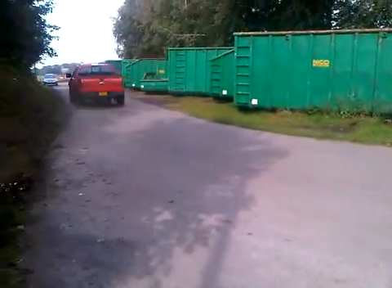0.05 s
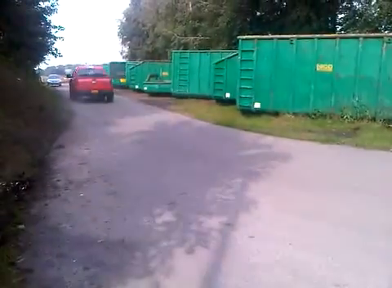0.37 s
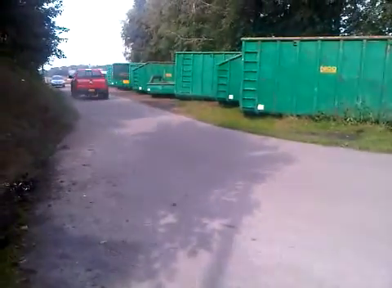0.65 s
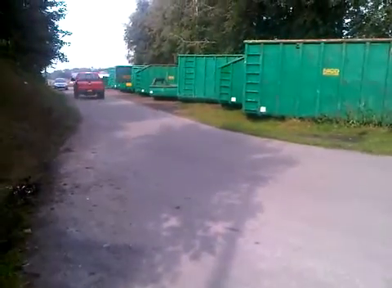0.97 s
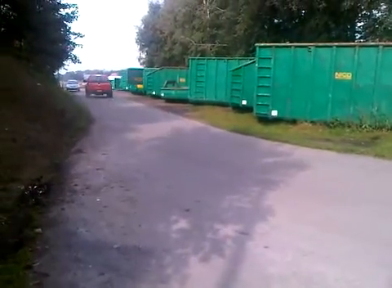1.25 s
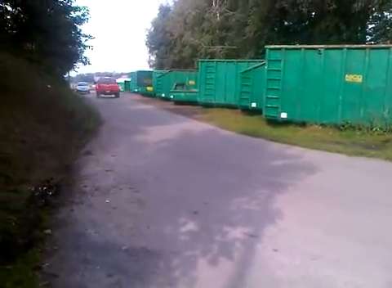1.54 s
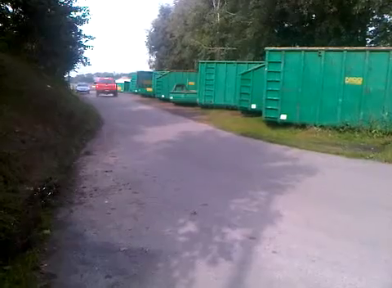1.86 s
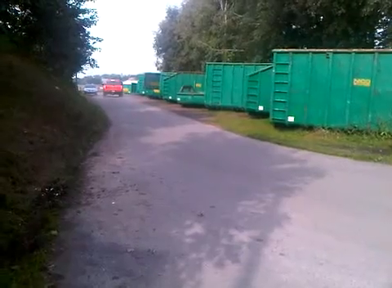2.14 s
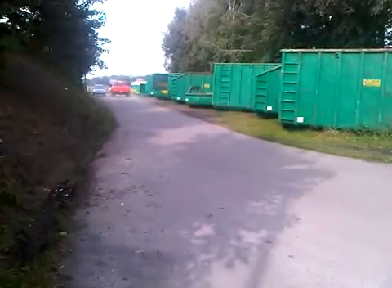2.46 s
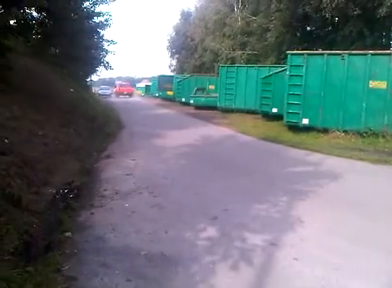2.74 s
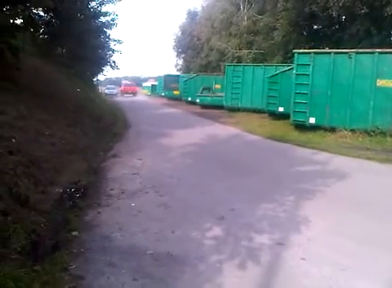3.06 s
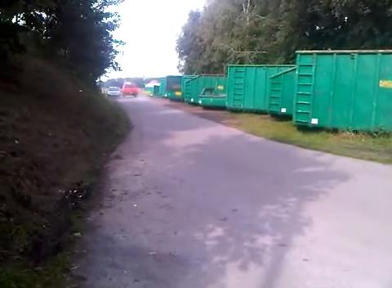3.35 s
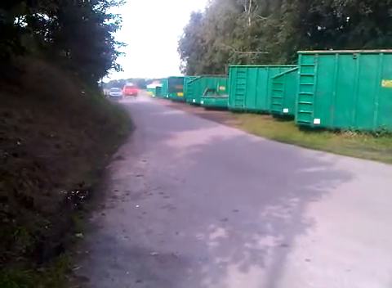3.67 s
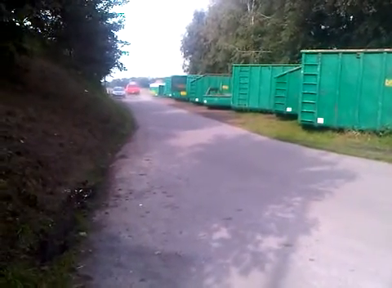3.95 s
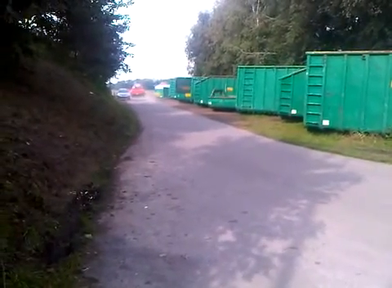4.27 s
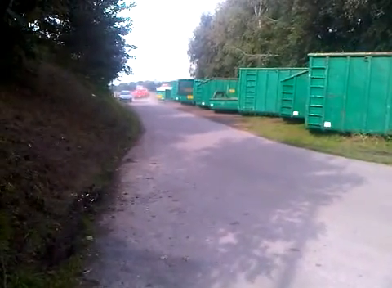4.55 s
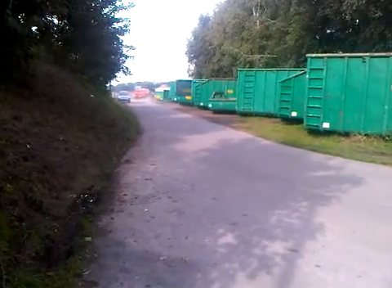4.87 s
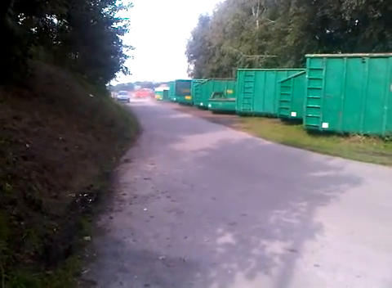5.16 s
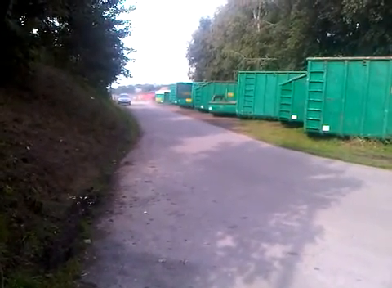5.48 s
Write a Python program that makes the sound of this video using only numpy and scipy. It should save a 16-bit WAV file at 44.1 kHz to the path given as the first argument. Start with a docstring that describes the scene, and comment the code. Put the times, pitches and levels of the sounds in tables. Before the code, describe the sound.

A large engine rumbles off along a paved road, easing off and fading into the distance, with soft wind and faint scuffs.

```python
"""A V8 pickup burbles past 12 m off and heads away down a paved lane; it changes up, coasts, pulls again.
Its two cylinder banks fire unevenly through the muffler, over tread roar and a rush of gas and grit.
Steel skips down the lane echo the note, and far off a roadside bank comes between truck and microphone.
Light wind hisses in the trees and bumps the microphone; something scuffs faintly close by."""
import sys
import numpy as np
from scipy import signal
from scipy.fft import rfft, irfft, next_fast_len
from scipy.io import wavfile

SR = 44100
rng = np.random.default_rng(int(sys.argv[2]) if len(sys.argv) > 2 else 0)


def dump_mix(stems):
    """Bounce the given channels to the path in sys.argv[1] as a 16-bit WAV at rate SR."""
    frames = np.atleast_2d(stems).T  # one column per channel
    limited = np.clip(frames, -1, 1)  # hard clip at full scale
    pcm = np.round(limited * 32767).astype(np.int16)
    wavfile.write(sys.argv[1], SR, pcm)


N = 247401
TIME = np.arange(N) / SR

# engine speed, eight firings to a cycle: (time [s], cycle rate [Hz])
ENGINE_SPEED = [(0, 24.3), (.1, 24.35), (.19, 24.85), (.29, 25.1), (.39, 24.85), (.57, 25.27), (.78, 25.8),
                (1.15, 26), (1.23, 24.2), (1.3, 22.8), (1.39, 22), (1.5, 19.4), (1.68, 17.4), (1.8, 17),
                (2, 16.7), (2.22, 16.1), (2.42, 14.7), (2.62, 15.4), (2.78, 14.7), (2.9, 15.5),
                (3.15, 15.7), (3.7, 15.6), (4, 15.2), (4.35, 14.2), (5.15, 14.8), (5.28, 23), (5.45, 23.8),
                (5.61, 23)]
# the driver pulls, lifts off, coasts and pulls again: (time [s], throttle [0-1])
THROTTLE = [(0, 0.86), (1.33, 0.75), (1.52, 0.34), (1.72, 0.07), (4.97, 0), (5.3, 0), (5.61, 0.5)]
def engine():
    """The V8 under the driver's foot: cycle rate, cycles turned so far, and throttle."""
    cycle_hz, = curves(ENGINE_SPEED)
    throttle, = curves(THROTTLE)
    return cycle_hz, np.cumsum(cycle_hz) / SR, throttle


def exhaust(cycle_hz, cycles, throttle, coast_db=-40.5, pull_db=14, shade_db=-17):
    """The tailpipe from up the lane: note, echo and rumble, rougher when coasting or behind the bank."""
    spread_db, hidden = journey()
    surge_db, splutter_db, burble_db = surges()
    note = engine_note(cycle_hz, cycles, throttle, hidden, burble_db)
    note += skip_echo(note)
    rumble = muffler_rumble(cycle_hz, cycles)
    roughness = gain_of(-15.75 + 4.5 * (1 - throttle) + 7.5 * hidden + splutter_db)
    level_db = coast_db + pull_db * throttle + spread_db + shade_db * hidden + surge_db
    level_db += 0.6 * wander(16)  # strong and weak cycles come in runs
    return gain_of(level_db) * (note + roughness * rumble) / np.sqrt(1 + roughness ** 2)


# engine orders, relative: (multiple of the cycle rate, level pulling [dB], level coasting [dB])
ORDERS = [(3, -21.5, -31), (4, -16.5, -32), (5, 5.5, -18.5), (6, -5.5, -24), (7, -3.5, -13.5),
          (8, 0.5, 2.5), (9, -20.5, -11.5), (10, -15.5, -9.5), (11, -14.5, -3.5), (12, -16, -18),
          (13, -5, -3.5), (14, -15.5, -6), (15, -36.5, -9.5), (16, -16, -18), (17, -18, -13),
          (18, -34.5, -5.5), (19, -32, -4.5), (20, -25.5, -24.5)]
# resonances the coasting engine sinks through: (frequency [Hz], half width [Hz], gain [dB])
BOOMS = [(172, 11, 11.5), (211.3, 7.2, 12), (235, 4, 5), (263, 9.6, -8), (293, 8.7, 2.5), (317.7, 6.9, 2)]
def engine_note(cycle_hz, cycles, throttle, hidden, burble_db, muffler_hz=327):
    """Each cylinder bank fires unevenly, so other orders burble around the firing note, order 8."""
    shaken = cycles + 0.003 * wander(28)  # the crank never turns quite evenly
    fading = np.sqrt(hidden)
    note, power = np.zeros(N), np.zeros(N)
    for order, pulling_db, coasting_db in ORDERS:
        order_hz = order * cycle_hz
        boom_db = sum(db / (1 + ((order_hz - hz) / width) ** 2) for hz, width, db in BOOMS)
        muffled = 1 / np.sqrt(1 + (order_hz / muffler_hz) ** 10)
        amplitude = muffled * gain_of(throttle * pulling_db + (1 - throttle) * (coasting_db + boom_db))
        # each order wavers as the truck moves, and breaks up behind the roadside bank
        amplitude *= gain_of((1.2 + 5 * fading) * wander(8.2))
        phase = 2 * np.pi * (order * shaken + rng.random()) + (0.06 + 0.5 * fading) * wander(12)
        if order != 8:
            amplitude *= gain_of(burble_db)
        note += amplitude * np.cos(phase)
        power += amplitude ** 2 / 2
    return note / np.sqrt(power)


# what the muffler lets through: (frequency [Hz], relative level [dB])
MUFFLER_SPECTRUM = [(20, -20), (60, -23), (90, -21.5), (108, -14), (128, -0.5), (170, -5.5), (215, -5),
                    (245, -3.5), (275, -3), (335, -3.5), (375, -13.5), (470, -26.5), (700, -38),
                    (1500, -68)]
# where it rings: (frequency [Hz], width [Hz], gain [dB])
MUFFLER_RINGS = [(131, 12, 6), (206, 12, 2.5), (280, 16, 7.5), (335, 18, 2), (394, 25, 2.5)]
def muffler_rumble(cycle_hz, cycles, gas=0.44):
    """The unequal part of each firing thuds through the muffler along with gas noise."""
    firings = np.diff(np.floor(8 * cycles), prepend=0)
    thuds = evened(firings * rng.standard_normal(N) / np.sqrt(cycle_hz))
    return coloured(thuds + gas * rng.standard_normal(N), MUFFLER_SPECTRUM, MUFFLER_RINGS)


# brief splutters and booms: (time [s], length [s], level [dB], roughness [dB], burble [dB])
SURGES = [(0.085, 0.39, 1, 8, -3.5), (0.33, 0.047, 1, -1, 1.5), (0.49, 0.3, -0.5, 2.5, 5),
          (0.377, 0.014, -6, 17, -2), (1.0, 0.26, -0.2, -4.5, -1.5), (1.22, 0.065, 2.5, 2.5, -0.5),
          (1.249, 0.01, -7, 0, 6.5), (1.308, 0.027, 5, 3, -15), (1.376, 0.036, 11, -5, -33.5),
          (1.451, 0.014, 9, 2.5, -18), (1.526, 0.05, 5, -8, 4.5), (1.9, 0.16, -1, -4, -1.5),
          (1.93, 0.02, -4, -3.5, 6), (2.7, 0.05, 3, -2, -7), (1.99, 0.05, 2.5, -3, -6.5),
          (1.434, 0.032, -0.5, -6.5, -1.5), (1.6, 0.05, 2, -6, 0), (2.27, 0.14, 4, -11.5, 2),
          (2.491, 0.036, 4.5, 16, 2), (2.58, 0.035, -5, 2, -1), (2.39, 0.056, -1.5, 8, 0),
          (2.857, 0.055, 0, -2, 5), (2.64, 0.039, 4.5, -2, 3), (2.922, 0.024, 4.5, -14, 12),
          (3.78, 0.17, 7, -6, 2.5), (5.097, 0.11, 6.5, 5.5, -12), (5.513, 0.57, 10, -9, -1.5),
          (5.38, 0.063, 2, 2, -2)]
def surges(shift_s=1.2, shift_db=-4):
    """Decibels added to the exhaust's level, roughness and burble; the burble dips at the gear change."""
    level_db, rough_db, burble_db = sum(np.outer(dbs, swell(s, length)) for s, length, *dbs in SURGES)
    return level_db, rough_db, burble_db + shift_db * swell(shift_s, length=0.05)


START_M, TRUCK_M_PER_S = 12.46, 10.82  # starting distance from the microphone; speed away from it
def journey(bank_from_m=37.1, bank_to_m=64.2):
    """Spreading loss in dB as the truck recedes, and how far the roadside bank hides it (0-1)."""
    distance_m = START_M + TRUCK_M_PER_S * TIME
    hidden = np.clip((distance_m - bank_from_m) / (bank_to_m - bank_from_m), 0, 1)
    return -20 * np.log10(distance_m / START_M), hidden


# the echo against the direct note: (time [s], level [dB])
ECHO_LEVEL = [(0, -10), (0.4, -6), (0.66, -15.5), (0.8, -1), (1.0, -2.5), (1.22, -1), (1.3, -15),
              (1.45, -19), (1.62, -5.5), (1.75, -10), (1.9, -1.5), (2.15, -14), (2.5, -2.5), (3.5, -8.5),
              (5.61, -3)]
def skip_echo(note, down_lane_m=45, aside_m=14, low_cut_hz=178):
    """Steel skips throw the note back without its bass, late and raised in pitch as the truck nears."""
    level_db, = curves(ECHO_LEVEL)
    ahead_m = down_lane_m - START_M - TRUCK_M_PER_S * TIME
    delay_s = (ahead_m + np.hypot(ahead_m, aside_m)) / 343
    thin = signal.sosfiltfilt(signal.butter(4, low_cut_hz, "high", fs=SR, output="sos"), note)
    return gain_of(level_db) * np.interp(TIME - delay_s, TIME, thin, left=0)


# hiss at the mouth of the tailpipe: (frequency [Hz], relative level [dB])
HISS_SPECTRUM = [(2000, -31.5), (2550, -15.5), (2750, -4.5), (2900, -0.5), (3130, -5), (3350, -17),
                 (4300, -31), (7000, -41.5)]
# its level at the microphone: (time [s], level [dB])
HISS_LEVEL = [(0, -65), (0.3, -56), (0.62, -64), (0.85, -56.5), (1.15, -61), (1.4, -68), (1.65, -80),
              (2, -100)]
def tailpipe_hiss(cycles, flutter_depth=0.28, flicker_db=0.26):
    """A thin, slightly fluttering tailpipe hiss that fades as the truck moves away."""
    level_db, = curves(HISS_LEVEL)
    flutter = 1 + flutter_depth * np.cos(2 * np.pi * 8 * cycles)
    hiss = coloured(rng.standard_normal(N) * flutter, HISS_SPECTRUM)
    return hiss * gain_of(level_db - flicker_db * wander(40))


# tread on the paving: (frequency [Hz], relative level [dB])
TYRE_SPECTRUM = [(100, -31), (460, -39), (530, -19), (620, -6.5), (695, 0), (770, 0), (860, -2),
                 (980, -7.5), (1120, -19), (1350, -13), (1600, -31), (3000, -73)]
# narrow colours in the roar: (frequency [Hz], width [Hz], gain [dB])
TYRE_RINGS = [(703, 10, 3.5), (760, 26, -0.5), (854, 61, 1.5)]
def tyre_roar(start_db=-46, spread_share=0.55, shade_db=-17, flutter_db=0.86):
    """The tread roars on the lane, losing less with distance than the exhaust does."""
    spread_db, hidden = journey()
    level_db = start_db + spread_share * spread_db + shade_db * hidden
    roar = coloured(rng.standard_normal(N), TYRE_SPECTRUM, TYRE_RINGS)
    return roar * gain_of(level_db + flutter_db * wander(62))


# gas and grit behind the truck: (frequency [Hz], relative level [dB])
RUSH_SPECTRUM = [(300, -6), (600, 3.5), (1100, -6), (1450, 2.5), (1750, -0.5), (2550, -3), (2900, 3),
                 (3300, -7.5), (4300, -19), (6000, -31), (7200, -38.5), (8200, -49.5)]
# narrow colours in the rush: (frequency [Hz], width [Hz], gain [dB])
RUSH_PEAKS = [(2316, 29, 4.5), (2985, 150, 2), (3490, 77, 4.5), (4915, 140, 11), (5685, 350, 11),
              (6830, 530, 12)]
def gas_rush(throttle, coast_db=-51.5, pull_db=4.5, shade_db=-5.5, flutter_db=1.25):
    """A rush of gas and grit follows the throttle and sinks away down the lane."""
    spread_db, hidden = journey()
    level_db = coast_db + pull_db * throttle + spread_db + shade_db * hidden
    rush = coloured(rng.standard_normal(N), RUSH_SPECTRUM, RUSH_PEAKS)
    return rush * gain_of(level_db + flutter_db * wander(64))


def grit_spray(at_s=2.07, level_db=-75):
    """A brief bright fizz of loose grit."""
    fizz = coloured(rng.standard_normal(N), [(2000, -26), (5000, 11.5), (6000, -5), (7500, -31)])
    return gain_of(level_db) * swell(at_s, length=0.05) * fizz


# pressure of an eddy: (frequency [Hz], relative level [dB])
EDDY_SPECTRUM = [(25, -36), (70, -2), (135, 6.5), (220, -1.5), (380, -7.5), (470, -11), (800, -14)]
# wind on the microphone: (time [s], level [dB], length [s], lower edge [Hz], upper edge [Hz])
WIND_BUMPS = [(3.318, -38.5, 0.014, 55, 560), (3.333, -39.5, 0.004, 297, 850), (3.342, -38, 0.013, 70, 330),
              (3.376, -41, 0.013, 109, 260), (3.484, -44.5, 0.011, 60, 200), (3.5, -41.5, 0.0077, 110, 280),
              (4.46, -48, 0.018, 65, 295), (4.501, -56.5, 0.025, 99, 182), (4.635, -52, 0.0086, 35, 220),
              (4.767, -58.5, 0.032, 55, 188)]
def wind_bumps():
    """Small eddies hit the microphone: brief dull bursts of pressure."""
    bumps, pressure = np.zeros(N), coloured(rng.standard_normal(N), EDDY_SPECTRUM)
    for s, db, length, low_hz, high_hz in WIND_BUMPS:
        envelope = swell(s, length)
        band = signal.butter(3, [low_hz, high_hz], "band", fs=SR, output="sos")
        eddy = signal.sosfilt(band, pressure) * envelope
        bumps += gain_of(db) * eddy * np.sqrt(np.sum(envelope ** 2) / np.sum(eddy ** 2))
    return bumps


# the dull part of a scuff: (frequency [Hz], relative level [dB])
SCRAPE_SPECTRUM = [(300, -16), (1100, -1.5), (1400, 5), (1900, 3), (2300, -14.5), (3500, -31),
                   (4100, -21.5), (7000, -42)]
# its ringing part: (frequency [Hz], relative level [dB])
RING_SPECTRUM = [(2000, -19), (2600, -3.5), (2800, 4.5), (3000, -1.5), (3300, -24), (3550, -8), (4100, -59)]
# faint scuffs: (time [s], level [dB], length [s], share that rings [0-1])
SCUFFS = [(2.08, -58, 0.044, 0.45), (2.62, -51, 0.0025, 0.37), (2.668, -58, 0.036, 0.66),
          (2.733, -56, 0.0017, 0.4), (2.856, -50.5, 0.0029, 0.9), (2.902, -61, 0.07, 0.8),
          (3.097, -62, 0.0018, 0.3), (4.382, -68, 0.67, 0.44), (4.413, -64.5, 0.0047, 0.4),
          (4.558, -56, 0.003, 0.6), (4.587, -60.5, 0.0075, 0.1), (4.637, -60, 0.0065, 0.8),
          (4.64, -69.5, 0.11, 0.55), (4.719, -60.5, 0.005, 1), (5.12, -68.5, 0.029, 0.6),
          (5.185, -58.5, 0.011, 0.17), (5.59, -67, 0.096, 0.2)]
def scuffs(grains_per_s=5000):
    """Something scuffs close to the microphone: short grainy bursts, some dull and some ringing."""
    grains = rng.standard_normal(N) * (rng.random(N) < grains_per_s / SR)
    grains *= gain_of(2 * np.minimum(rng.exponential(1, N), 3))  # a few grains stand out
    scrape, ring = coloured(grains, SCRAPE_SPECTRUM), coloured(grains, RING_SPECTRUM)
    bursts = np.zeros(N)
    for s, db, length, share in SCUFFS:
        bursts += gain_of(db) * swell(s, length) * (np.sqrt(1 - share) * scrape + np.sqrt(share) * ring)
    return bursts


# light wind in the trees: (frequency [Hz], relative level [dB])
BREEZE_SPECTRUM = [(25, -8.5), (70, 11), (200, 12.5), (450, -2.5), (800, -4), (1130, -2), (1370, -1),
                   (1900, -0.5), (2300, -12.5), (2780, 8.5), (3000, -12), (3250, -9), (3550, 1.5),
                   (4100, -17.5), (5600, -15), (7000, -22), (8000, -49)]
def breeze(level_db=-68, flicker_db=1.77):
    """Leaves hiss behind everything else, flickering a little."""
    hiss = coloured(rng.standard_normal(N), BREEZE_SPECTRUM)
    return hiss * gain_of(level_db + flicker_db * wander(11))


def gain_of(db):
    """Decibels to amplitude."""
    return 10 ** (db / 20)


def evened(x):
    """Scales to rms 1."""
    return x / np.sqrt(np.mean(x ** 2) + 1e-20)


def curves(rows):
    """Each column of a timed table, sample by sample."""
    times, *columns = np.transpose(rows)
    return [np.interp(TIME, times, column) for column in columns]


def coloured(x, spectrum, peaks=()):
    """Filters by a spectrum with narrow peaks on top; rms 1."""
    size = next_fast_len(N + 8192)
    hz = np.fft.rfftfreq(size, 1 / SR)
    points_hz, points_db = np.transpose(spectrum)
    db = np.interp(np.log(hz + 1), np.log(points_hz), points_db)
    db += sum(peak_db * np.exp(-((hz - centre) / width) ** 2) for centre, width, peak_db in peaks)
    return evened(irfft(rfft(x, size) * gain_of(db), size)[:N])


def wander(rate_hz, size=2048):
    """Smooth random drift of rms 1, rolling off above the given rate."""
    hz = np.fft.rfftfreq(size, N / SR / size)
    slow = irfft(rfft(rng.standard_normal(size)) / (1 + (hz / rate_hz) ** 4))
    return np.interp(np.arange(N) / N * size, np.arange(size), evened(slow))


def swell(s, length):
    """A bell-shaped envelope around time s."""
    return np.exp(-2 * np.minimum(((TIME - s) / length) ** 2, 20))


def scene():
    """The truck, the trees and the wind at one microphone standing in the lane."""
    cycle_hz, cycles, throttle = engine()
    tailpipe = exhaust(cycle_hz, cycles, throttle) + tailpipe_hiss(cycles)
    road = tyre_roar() + gas_rush(throttle) + grit_spray()
    surroundings = breeze() + scuffs() + wind_bumps()
    return (tailpipe + road + surroundings)[None]


def record(dry):
    """The recorder cuts the treble above 7900 Hz."""
    low_pass = signal.firwin(511, 7900, window=("kaiser", 9), fs=SR)
    return signal.oaconvolve(dry, low_pass[None], "same")


dry = scene()
out = record(dry)
dump_mix(out)
```